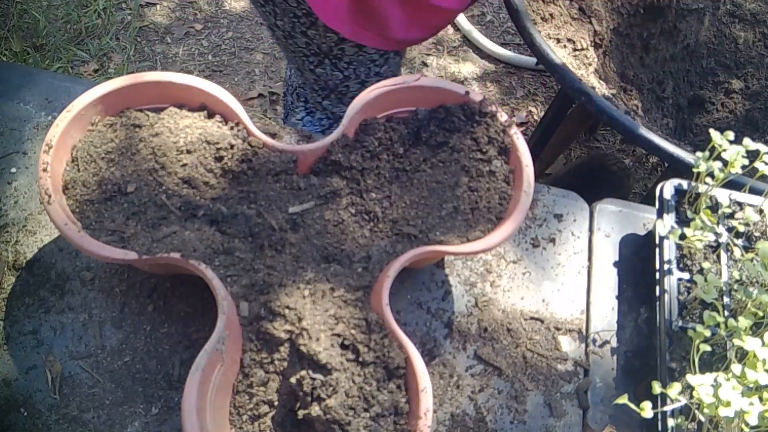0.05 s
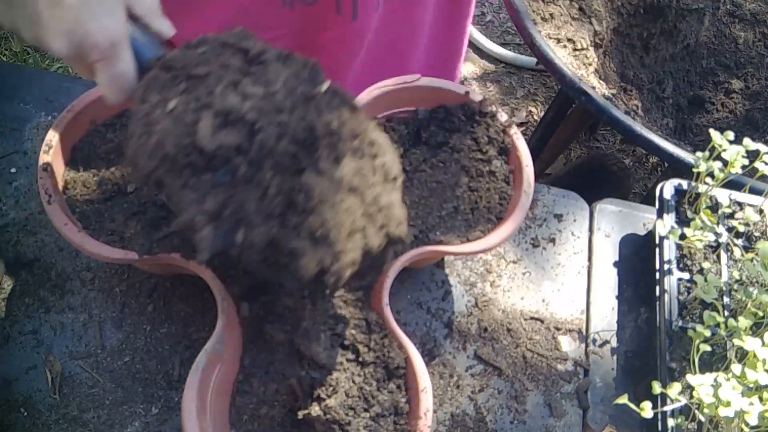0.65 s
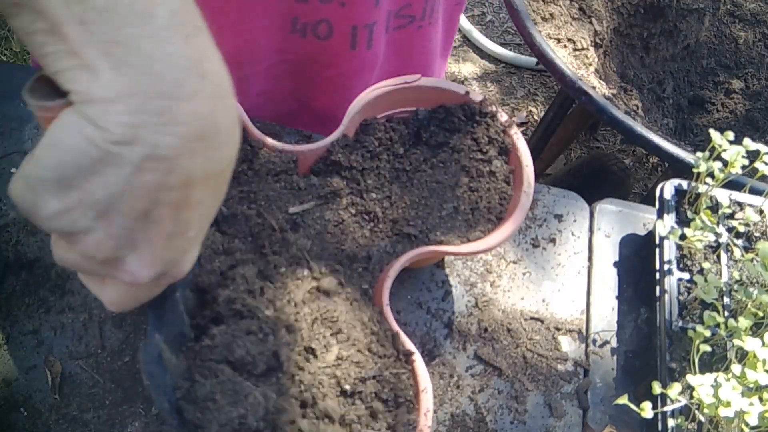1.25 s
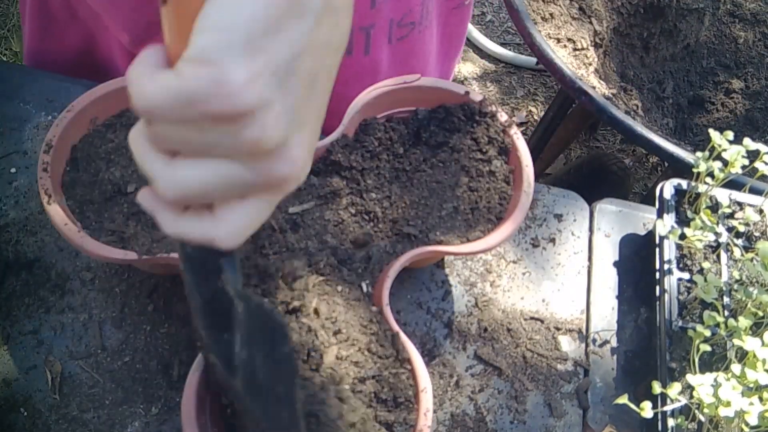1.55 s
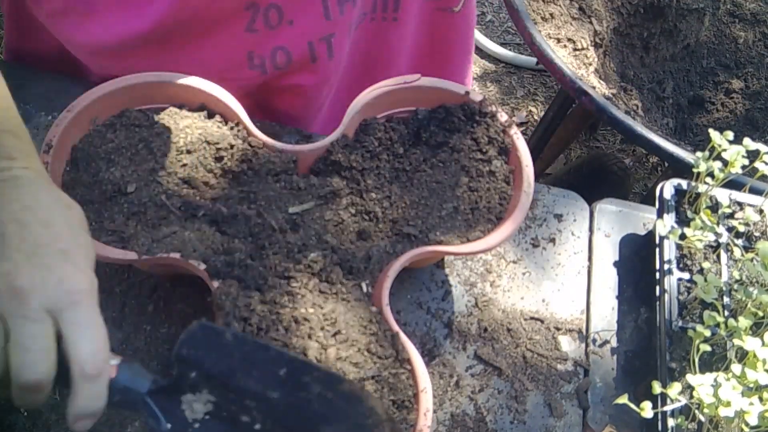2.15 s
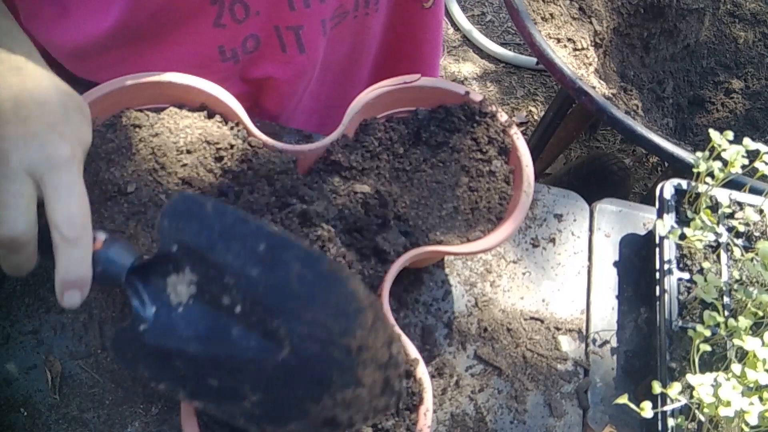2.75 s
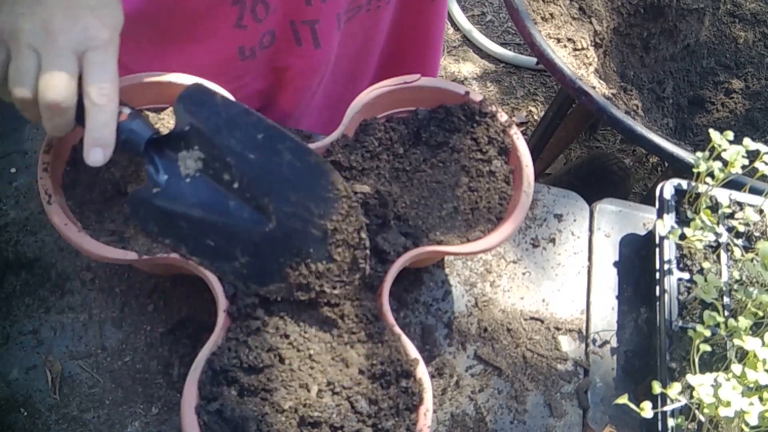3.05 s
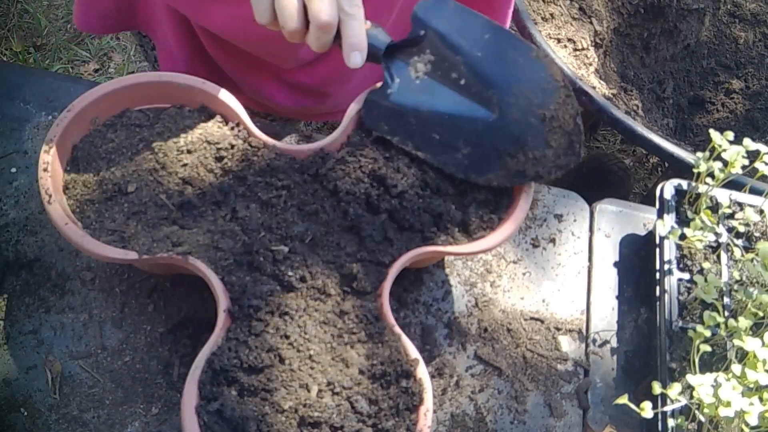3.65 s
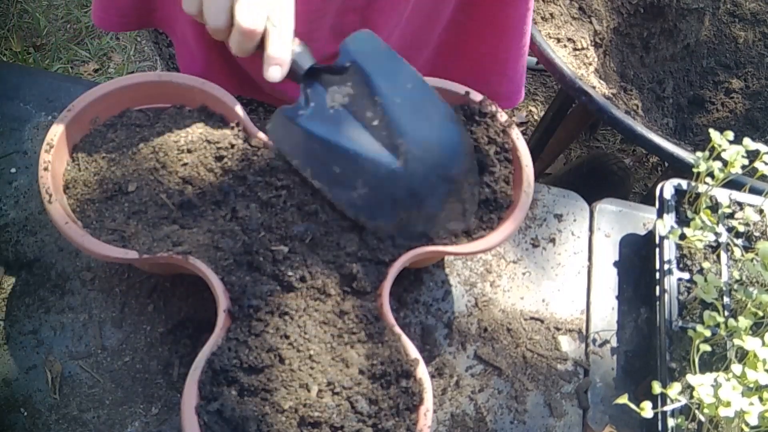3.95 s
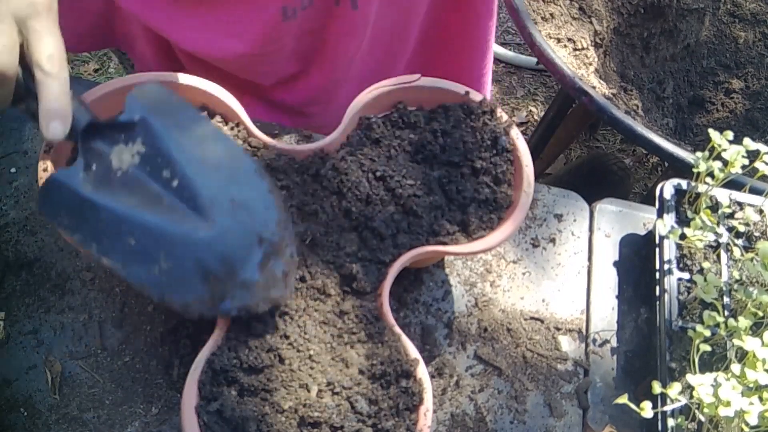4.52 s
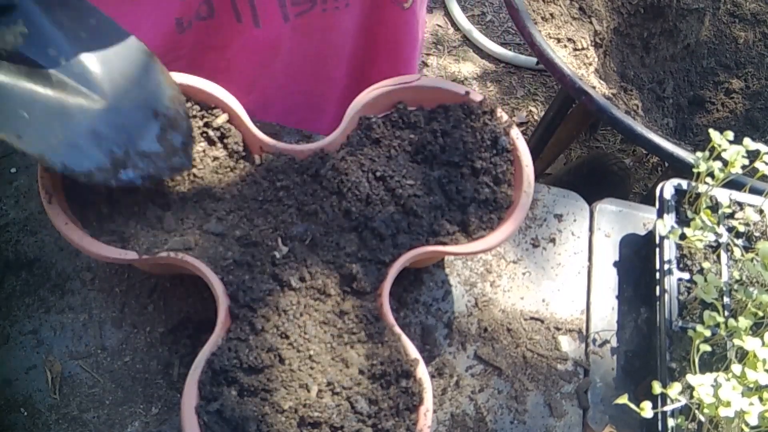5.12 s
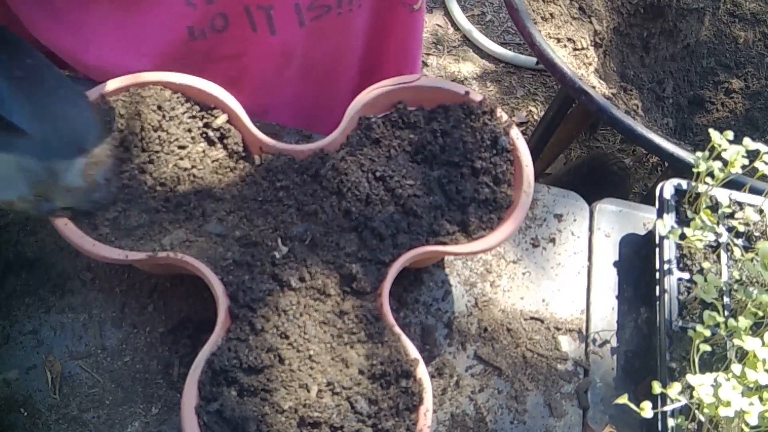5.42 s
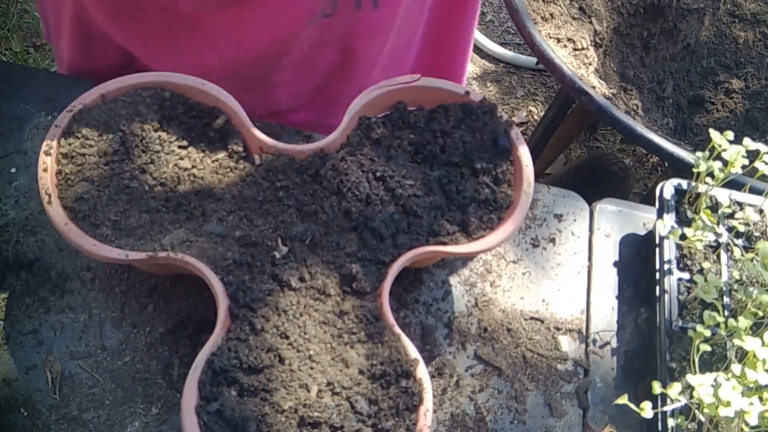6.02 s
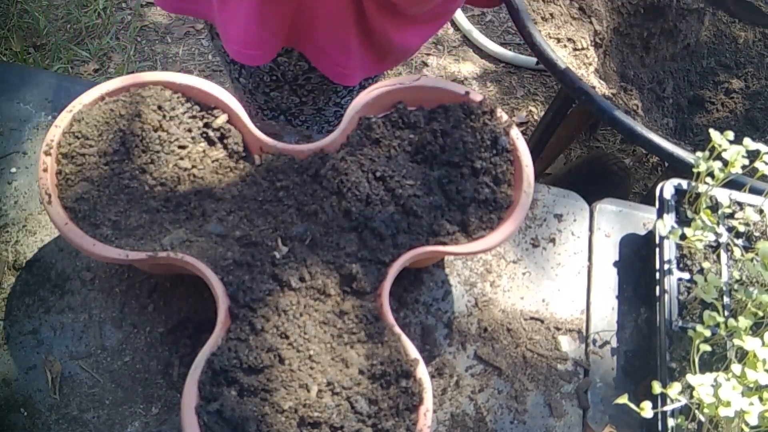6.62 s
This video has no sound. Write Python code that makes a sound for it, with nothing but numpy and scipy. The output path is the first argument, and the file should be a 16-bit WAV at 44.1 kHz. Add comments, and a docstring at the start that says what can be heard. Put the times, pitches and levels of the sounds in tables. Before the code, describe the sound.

Outdoors, close to the microphone, a small trowel pours soil into a plastic pot, and clods and little stones patter down. A string of uneven taps and brief sandy scrapes follows, each with a damped clink of the blade or a dull bump from the pot, with small spills between. A soft background hush runs throughout, with one faint, thin squeal. After a last louder scrape, only the hush and a single tick remain.

```python
"""A hand trowel knocks and drags in a plastic planter of soil, outdoors and close to the microphone.
Impacts and stick-slip friction on grit excite the damped modes of its blade, and each blow thumps the pot.
The loose soil it tips in hisses as a granular flow, and falling crumbs tick as brief damped resonances.
Behind it lie a steady outdoor hush and one faint squeal."""
import sys
import numpy as np
from scipy import signal
from scipy.fft import rfft, irfft
from scipy.io import wavfile
from scipy.ndimage import uniform_filter1d

SR = 44100
rng = np.random.default_rng(int(sys.argv[2]) if len(sys.argv) > 2 else 0)


def wrap_up_sound(samples):
    """Save the sound to the file named by the first command line argument, as 16-bit audio."""
    columns = np.atleast_2d(samples).T
    # keep every value between -1 and 1, then stretch to whole-number steps
    tamed = np.clip(columns, -1, 1)
    steps = np.round(tamed * 32767).astype(np.int16)
    wavfile.write(sys.argv[1], SR, steps)


N = 303408
TIME = np.arange(N) / SR
RING_TIME = TIME[:8192]  # time axis of an impulse response [s]


def undb(db):
    """Amplitude ratio of a level in decibels."""
    return 10 ** (np.asarray(db) / 20)


def unit(response):
    """Normalisation to unit energy."""
    return response / np.sqrt(np.sum(response ** 2))


def through(x, response):
    """Linear filtering by convolution, cut to the length of the input."""
    return signal.fftconvolve(x, response)[:len(x)]


def add(out, start_s, x):
    """Superposition of x on out from a given time."""
    i = int(start_s * SR)
    out[i:i + len(x)] += x[:N - i]


def colour(points):
    """Minimum-phase impulse response of a (frequency [Hz], level [dB]) spectrum, by cepstral folding."""
    hz, db = np.transpose(points)
    size = len(RING_TIME)
    bins = np.maximum(np.fft.rfftfreq(size, 1 / SR), 1)
    magnitude = undb(np.interp(np.log(bins), np.log(hz), db))
    cepstrum = irfft(np.log(magnitude))
    cepstrum[1:size // 2] *= 2
    cepstrum[size // 2 + 1:] = 0
    return irfft(np.exp(rfft(cepstrum)))


def mode(hz, t60):
    """A damped oscillator, heard as the derivative of its motion, so that it radiates little bass."""
    motion = np.sin(2 * np.pi * hz * RING_TIME) * np.exp(-np.log(1000) * RING_TIME / t60)
    return np.diff(motion, append=0) * SR / (2 * np.pi * hz)


def walk(rate):
    """Smooth random modulation of unit variance, with rate new values a second."""
    size = max(int(SR / rate), 1)
    steps = np.repeat(rng.standard_normal(N // size + 1), size)
    smooth = uniform_filter1d(steps, size)[:N]
    return smooth / smooth.std()


def grains(size, rate, spread_db):
    """Shot noise at unit rms: rate tiny impacts a second, many weak and a few strong."""
    strength = undb(spread_db * np.minimum(rng.exponential(size=size), 4))
    impacts = (rng.random(size) < rate / SR) * rng.choice([-1, 1], size) * strength
    return impacts / (np.sqrt(np.mean(impacts ** 2)) + 1e-12)


def swell(start, crest, end, db, edge_db=-15):
    """Amplitude envelope of one hand movement: a Gaussian rise and fall about its crest."""
    span = slice(int(start * SR), int(end * SR))
    from_crest = np.interp(TIME[span], [start, crest, end], [-1, 0, 1])
    gain = np.zeros(N)
    gain[span] = undb(db + edge_db * from_crest ** 2)
    return gain


# spectrum of the distant hush: (frequency [Hz], relative level [dB])
HUSH_SPECTRUM = [(25, -13), (65, -6), (100, -5), (200, -8.5), (450, -7.5), (700, -1), (950, 0.5),
                 (1400, 2.5), (2100, 0), (3000, -3), (4000, -17.5), (7000, -21.5), (11000, -26),
                 (16000, -13)]
# envelope of the hush: (time [s], level [dB])
HUSH_ENVELOPE = [(0, -40.5), (.8, -40.5), (6.88, -42)]


def outdoors(flicker_db=0.27):
    """Broadband ambient noise, wavering under slight amplitude modulation."""
    times, db = np.transpose(HUSH_ENVELOPE)
    air = through(rng.standard_normal(N), unit(colour(HUSH_SPECTRUM)))
    return air * undb(np.interp(TIME, times, db) + flicker_db * walk(13))


# envelope of a faint squeal some way off: (time [s], level [dB])
SQUEAL_ENVELOPE = [(2.68, -60), (2.72, -40.5), (2.76, -44), (2.775, -34), (2.805, -37.5), (2.82, -41.5),
                   (2.9, -38), (2.95, -61)]
# its partials: (frequency [Hz], relative level [dB])
SQUEAL_TONES = [(1136, -1), (2272, -8.5), (3970, -19)]


def squeal(waver=0.0068):
    """A thin tone of three partials, unsteady through random frequency and amplitude modulation."""
    times, db = np.transpose(SQUEAL_ENVELOPE)
    clock = np.cumsum(1 + waver * walk(90)) / SR
    tone = sum(undb(level + walk(70)) * np.sin(2 * np.pi * hz * clock) for hz, level in SQUEAL_TONES)
    return np.sqrt(2) * tone * np.interp(TIME, times, undb(db), left=0, right=0)


# soil slides off the blade: (start [s], crest [s], end [s], level [dB])
SOIL_SPILLS = [(0.72, 0.788, 0.8, -45), (0.978, 1.16, 1.39, -39.5), (1.247, 1.485, 1.835, -42),
               (1.817, 1.895, 2.02, -49), (2.29, 2.48, 2.49, -40), (2.533, 2.59, 2.648, -44.5),
               (3.277, 3.47, 3.36, -45), (5.34, 5.393, 5.46, -43.5), (5.732, 5.89, 6.08, -55)]


def soil_flow(shed_db=-26, settle_s=0.063, background_hiss_db=-63):
    """Flow envelope: spills, and soil stirred by the drags that settles by exponential decay."""
    spilled = sum(swell(*spill, edge_db=-14) for spill in SOIL_SPILLS)
    pressure = sum(swell(*stroke[:4]) for stroke in DRAG_STROKES)
    decay = np.exp(-1 / (settle_s * SR))
    stirred = signal.lfilter([1 - decay], [1, -decay], pressure)
    # the constant floor gives a faint steady high hiss of the outdoor background
    return spilled + undb(shed_db) * stirred + undb(background_hiss_db)


# spectra of fine sand and of coarse soil: (frequency [Hz], relative level [dB])
SAND_SPECTRUM = [(500, -19), (2000, -34), (4000, -6), (9000, -1), (16000, 4.5)]
SOIL_SPECTRUM = [(100, -27), (500, -7), (1200, 2.5), (2400, 5), (3500, 1), (5000, -12.5), (16000, -10)]


def trickle(surge_db=2.5, stone_db=-7, clod_db=-6):
    """Granular flow as shot noise: dense sand and coarse grains, with sparser stones and clods."""
    flow = soil_flow() * undb(surge_db * walk(50))
    fine = grains(N, rate=9000, spread_db=3.6) + undb(stone_db) * grains(N, rate=60, spread_db=3.4)
    coarse = grains(N, rate=2500, spread_db=0.7) + undb(clod_db) * grains(N, rate=120, spread_db=2)
    hiss = through(fine * flow, unit(colour(SAND_SPECTRUM)))
    patter = through(coarse * flow, unit(colour(SOIL_SPECTRUM)))
    return hiss + patter


# clods and small stones strike the pot: (time [s], level [dB], frequency [Hz], relative click level [dB])
CRUMB_IMPACTS = [ (.547, -39, 3500, 6), (1.218, -12.5, 2750, -12), (1.227, -13.5, 2390, -18),
                 (1.312, -16, 2600, -14), (1.35, -10, 2110, -14), (1.401, -17, 1260, -22),
                 (1.408, -19.5, 1280, -10), (1.446, -13.5, 2040, -8), (1.467, -11.5, 1810, -11),
                 (1.504, -5, 1260, -34), (1.509, -11, 1400, -34), (1.871, -17, 1900, -6.5),
                 (1.91, -18, 1790, -15), (1.924, -15.5, 1970, -11), (2.009, -25.5, 3370, 12),
                 (2.063, -22, 2760, -2.5), (2.183, -4, 3015, -7.5), (2.374, -21, 2510, -10),
                 (2.918, -5.5, 3460, -7), (3.079, -15.5, 2380, -5), (3.34, -16.5, 2620, -2),
                 (6.836, -17.5, 2500, 0)]


def crumbs(bit_click_db=-8, cycles=6, scatter_db=-21, scatter_s=0.0071):
    """Impact and fragmentation: each crumb rings for a few cycles, clicks and breaks into smaller bits."""
    out = np.zeros(N)
    for start, db, hz, click_db in CRUMB_IMPACTS:
        bits = grains(len(RING_TIME), rate=5000, spread_db=3.1)
        bits *= undb(scatter_db) * np.exp(-RING_TIME / scatter_s)
        # a softer clod stays in contact longer, which low-passes its knock
        softness = signal.butter(2, min(2 * hz, SR / 3), fs=SR, output="sos")
        knock = signal.sosfilt(softness, mode(hz, cycles / hz))
        click = undb(click_db + 11.5) * mode(hz=11900, t60=0.00055)
        fragments = through(bits, knock + undb(bit_click_db) * click)
        add(out, start, undb(db) * (knock + click + fragments))
    return out


# blade modes, damped by soil and hand: (base frequency [Hz], 60 dB decay time [s], relative level [dB])
BLADE_MODES = [(1254, 0.047, 0.5), (1371, 0.032, 4.5), (1870, 0.01, -8.5), (2135, 0.059, 4),
               (2265, 0.027, -0.5), (2757, 0.059, -1.5), (2933, 0.025, -5.5), (3307, 0.012, 0),
               (3800, 0.021, -3.5), (3945, 0.019, -5), (4160, 0.0032, -5)]


def blade(ring_db, contact, breadth, tuning, floor_db=-19):
    """Modal superposition: the contact point favours modes from the lowest (0) to the highest (1)."""
    hz, t60, db = np.transpose(BLADE_MODES)
    place = np.log(hz / hz[0]) / np.log(hz[-1] / hz[0])
    coupling = np.exp(-((place - contact) / breadth) ** 2) + undb(floor_db)
    gain = undb(db + ring_db) * coupling
    return sum((-1) ** k * gain[k] * unit(mode(hz[k] * tuning, t60[k])) for k in range(len(hz)))


# spectrum of the crack of a blow: (frequency [Hz], relative level [dB])
CRACK_SPECTRUM = [(60, -60), (300, -11.5), (700, 8), (1300, 5.5), (2500, -5), (4200, -8), (16000, -6)]
# the blade lands on soil and pot: (time [s], relative knock level [dB], relative ring level [dB],
# contact point [0-1], thud level [dB], thud frequency [Hz])
BLOWS = [ (1.503, -23, -5, 0.2, -29.5, 379), (2.183, -10.5, 10.5, 0.13, -32.5, 150),
         (2.230, -12.5, 20, 0.03, -53, 168), (2.557, -26.5, 2, 0.15, -38, 278),
         (2.566, -28.5, -4, 0.2, -38, 303), (2.597, -28.5, 4, 0.18, -41.5, 239),
         (2.918, -14, 6.5, 0.57, -55, 197), (3.468, -25, -13, 0.1, -34.5, 298),
         (3.569, -16, 6, 0, -55, 250), (3.944, -14, 0, 0.19, -25, 146), (4.064, -17.5, 15, 0, -58, 200),
         (4.104, -20, 1.5, 0.69, -49, 167), (4.612, -17.5, -2, 0.47, -28, 412),
         (4.764, -19, 9, 0.06, -49, 298), (4.925, -31, -17, 0, -39, 474),
         (5.393, -16.5, 0.5, 0.55, -39, 313), (5.430, -10.5, 9, .52, -32.5, 584)]


def knocks(crush_s=0.0053, crush_db=-20, blow_db=22, thud_t60=0.068,
           push_s=0.00083, shift_db=-9, shift_s=0.032):
    """Impulsive excitation: a blow crushes a few crumbs, rings the blade and thumps the soil-filled pot."""
    out = np.zeros(N)
    crack = unit(colour(CRACK_SPECTRUM))
    for start, db, ring_db, contact, pot_db, pot_hz in BLOWS:
        force = undb(crush_db) * rng.standard_normal(len(RING_TIME)) * np.exp(-RING_TIME / crush_s)
        force[0] += 1  # the impulse that leads the crushing
        body = unit(crack + blade(ring_db, contact, breadth=0.33, tuning=0.96))
        add(out, start, undb(db + blow_db) * unit(through(force, body)))
        thud = mode(pot_hz, thud_t60) - 0.11 * mode(0.716 * pot_hz, thud_t60)
        thud -= 0.65 * mode(1.04 * pot_hz, thud_t60 / 2)
        # packed soil shifts for a moment: a dull rumble around the pot's pitch
        rumble_spectrum = [(pot_hz / 5, -24), (pot_hz / 2, 0), (2 * pot_hz, -2), (10 * pot_hz, -45)]
        rumble = through(rng.standard_normal(len(RING_TIME)), unit(colour(rumble_spectrum)))
        thud += undb(shift_db) * rumble * np.exp(-RING_TIME / shift_s)
        onset = 1 - np.exp(-RING_TIME / push_s)  # soft soil passes the blow to the pot gradually
        add(out, start, undb(pot_db) * thud * onset)
    return out


# spectrum of slipping grit: (frequency [Hz], relative level [dB])
GRIT_SPECTRUM = [(60, -35), (400, -17.5), (750, -8.5), (1200, 5.5), (2000, 9), (3000, -4), (4200, -9.5),
                 (7000, -8.5), (16000, -18)]
# drags of the blade: (start [s], crest [s], end [s], crest level [dB], relative ring level [dB],
# contact point [0-1], contact breadth [0-1], tuning under load [ratio], relative hiss level [dB])
DRAG_STROKES = [ (2.187, 2.232, 2.256, -25, 0.5, 0.6, 0.27, 1, 1),
                (2.467, 2.48, 2.491, -17, -3, 0.67, 0.36, 1.14, 2.5),
                (2.917, 2.927, 3.058, -20, -1, 0.87, 0.41, 1.056, 5),
                (3.344, 3.433, 3.447, -27, -4, 0.65, 0.43, 0.96, 0),
                (3.456, 3.548, 3.584, -21, 3.5, 0.17, 0.29, 0.96, -6),
                (3.956, 3.992, 4.020, -25.5, -6, 0.07, .4, .98, -2),
                (4.008, 4.022, 4.070, -17, 2.5, 0.5, 0.84, 1.02, 2),
                (4.632, 4.733, 4.780, -17.5, 4, 0.54, .9, 0.99, -3),
                (4.762, 4.790, 4.910, -40, -1, 0, .15, 1, 6),
                (4.917, 4.925, 4.968, -27.5, 4.5, 0.99, 0.22, 0.82, 6),
                (5.268, 5.287, 5.298, -32, -3, 0.28, 0.26, 1, 1.5),
                (5.389, 5.418, 5.445, -16.5, 9, 0.35, 0.31, 1.035, 1)]


def drags(blade_db=-5, judder_db=2.0, wander=0.01317, sand_db=-10.0):
    """Stick-slip friction: grit under the blade gives dense clicks, heard directly and through its modes."""
    out = np.zeros(N)
    grit, sand = unit(colour(GRIT_SPECTRUM)), unit(colour(SAND_SPECTRUM))
    slips = grains(N, rate=2600, spread_db=2.5)
    # the hand's steady push releases about the same energy every few milliseconds
    slips /= np.sqrt(uniform_filter1d(slips ** 2, size=400) + 1e-4)
    slips *= undb(judder_db * walk(260))
    # sand hisses in short spurts as single crumbs give way
    spurts = grains(N, rate=1600, spread_db=3.4) * undb(3.7 * walk(160) + 2.0)
    # the soil's changing load pulls the mode frequencies up and down a little
    detuning = 1 + wander * walk(45)
    for start, crest, end, db, ring_db, contact, breadth, tuning, hiss_db in DRAG_STROKES:
        span = slice(int(start * SR), int(end * SR))
        pressure = swell(start, crest, end, db)[span]
        modes = blade(blade_db + ring_db, contact, breadth, tuning)
        drive = pressure * slips[span] / np.linalg.norm(grit + modes)
        ring = signal.fftconvolve(drive, modes)
        clock = np.cumsum(np.roll(detuning, -span.start)[:len(ring)])
        loaded_ring = np.interp(clock, np.arange(len(ring)), ring)
        scrape = signal.fftconvolve(drive, grit)
        hiss = signal.fftconvolve(pressure * spurts[span], undb(hiss_db + sand_db) * sand)
        add(out, start, loaded_ring + scrape + hiss)
    return out


def scene(scatter_db=-17.5, decay_s=0.017, delay_s=0.005):
    """Superposition of trowel and soil, their weak reflections from paving and pots, and the background."""
    direct = drags() + knocks() + crumbs() + trickle()
    scatter_envelope = np.exp(-RING_TIME / decay_s) * (RING_TIME > delay_s)
    patio = unit(rng.standard_normal(len(RING_TIME)) * scatter_envelope)
    reflected = undb(scatter_db) * through(direct, patio)
    return (direct + reflected + squeal() + outdoors())[None]


# response of the microphone's port, two deep notches and a peak above them: (frequency [Hz], gain [dB])
PORT_RESPONSE = [(3000, -0.5), (4400, -3), (4900, -8.5), (5600, -20.5), (6000, -37.5), (6400, -24),
                 (7100, -21), (7600, -26), (8000, -36), (8500, -23), (9600, -8), (11200, -3),
                 (13000, -12.5), (16000, -28)]


def record(dry, cutoff_hz=15900):
    """Linear filtering: the microphone's port colours the sound and a steep low-pass cuts the top."""
    coloured = through(dry[0], colour(PORT_RESPONSE))
    low_pass = signal.ellip(10, .2, 80, cutoff_hz, fs=SR, output="sos")
    return signal.sosfilt(low_pass, coloured)[None]


dry = scene()
out = record(dry)
wrap_up_sound(out)
```